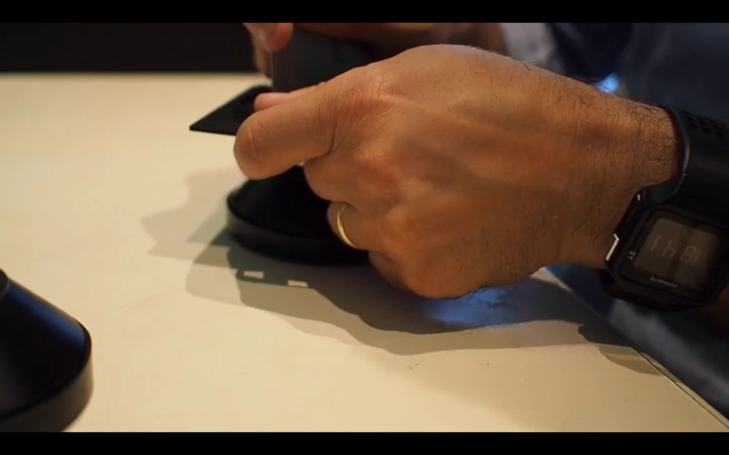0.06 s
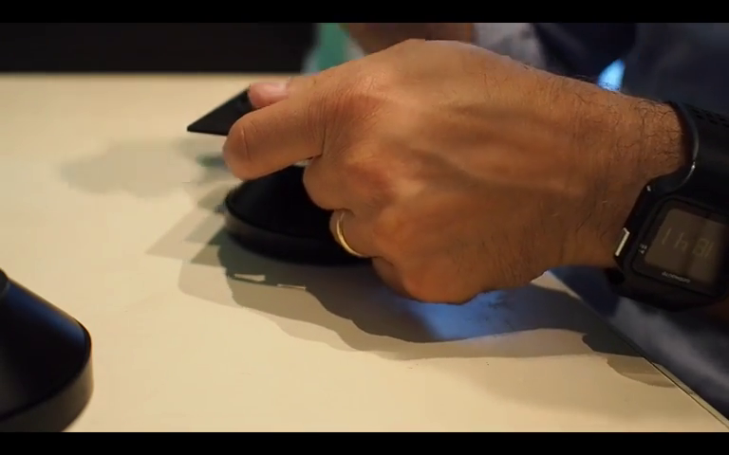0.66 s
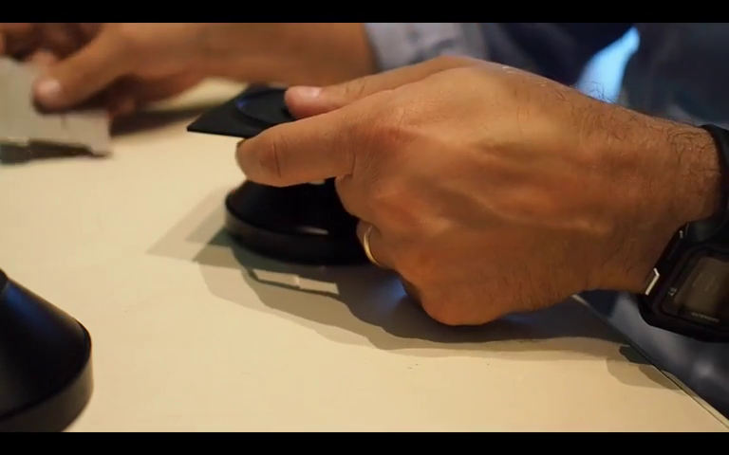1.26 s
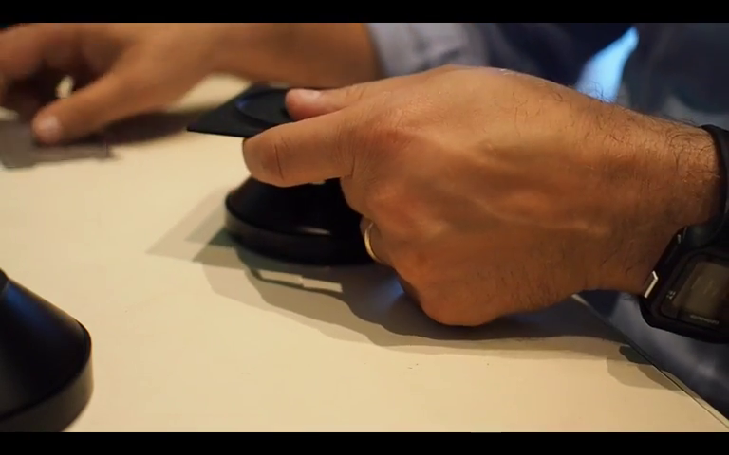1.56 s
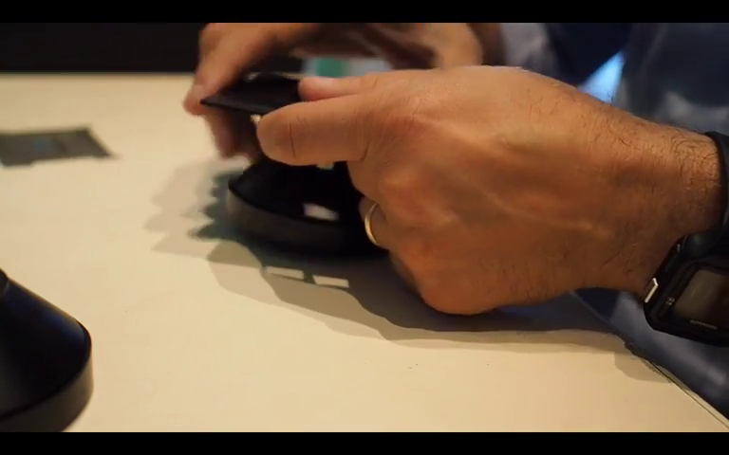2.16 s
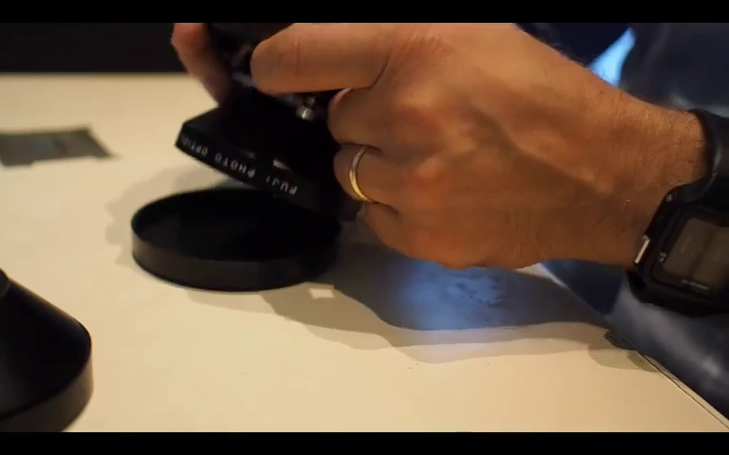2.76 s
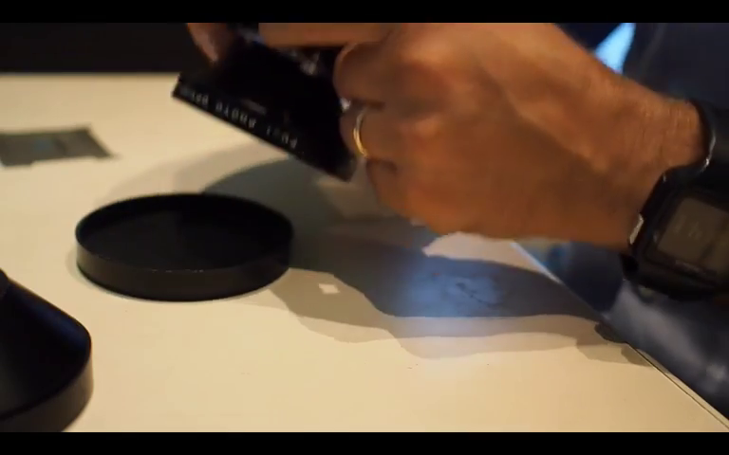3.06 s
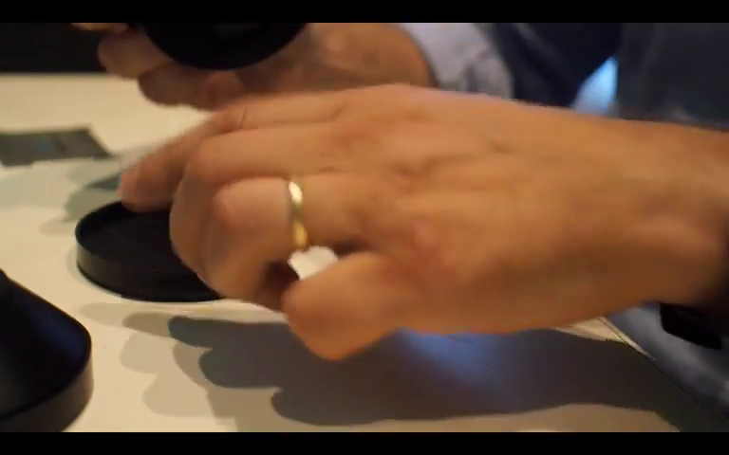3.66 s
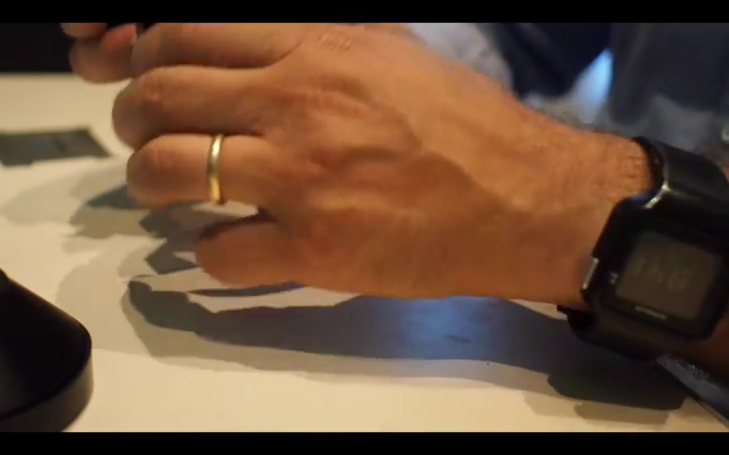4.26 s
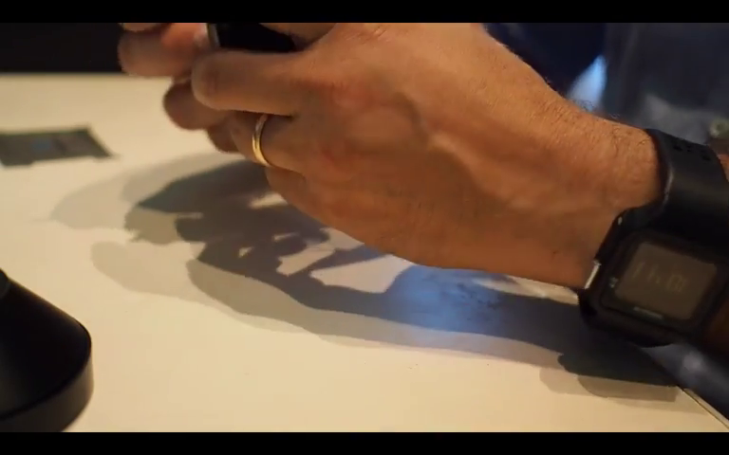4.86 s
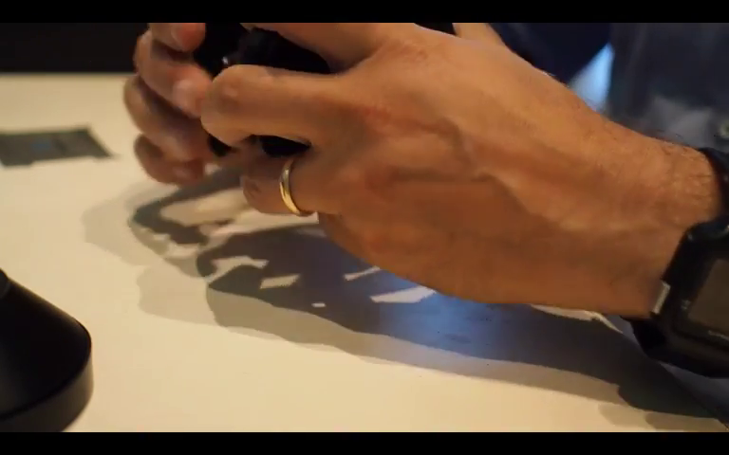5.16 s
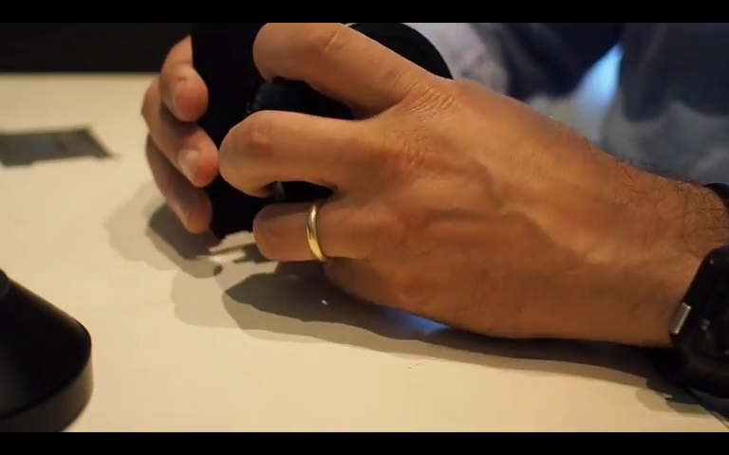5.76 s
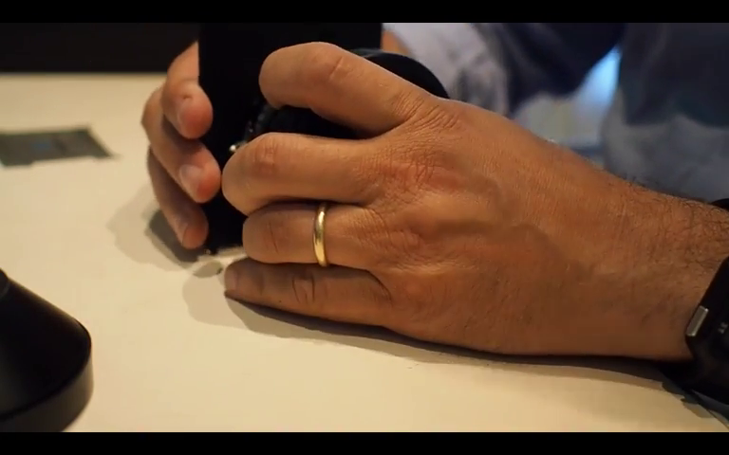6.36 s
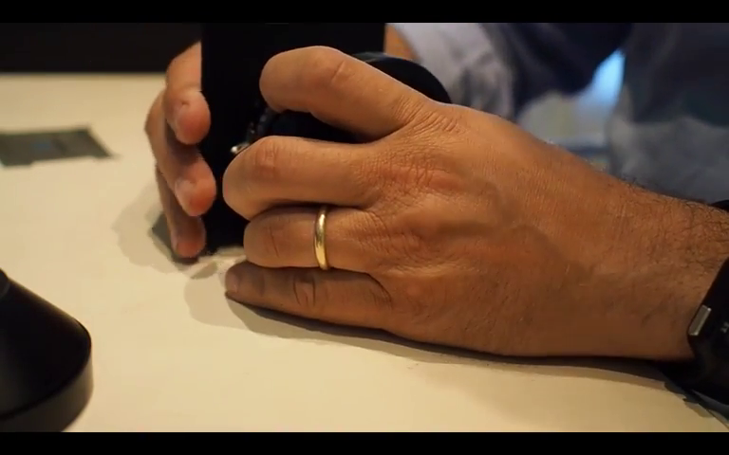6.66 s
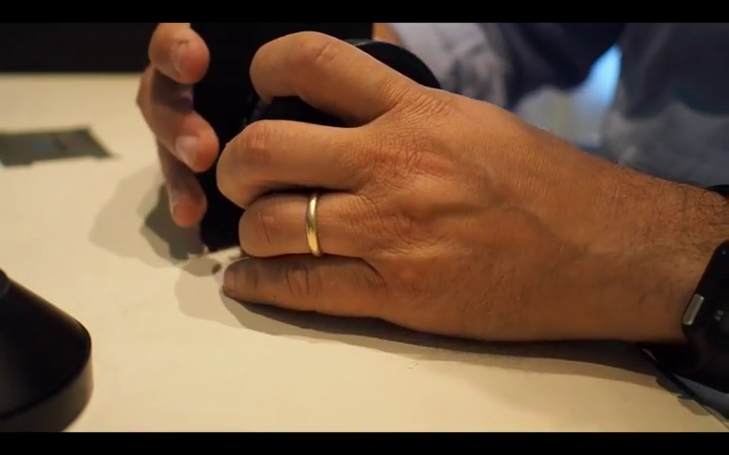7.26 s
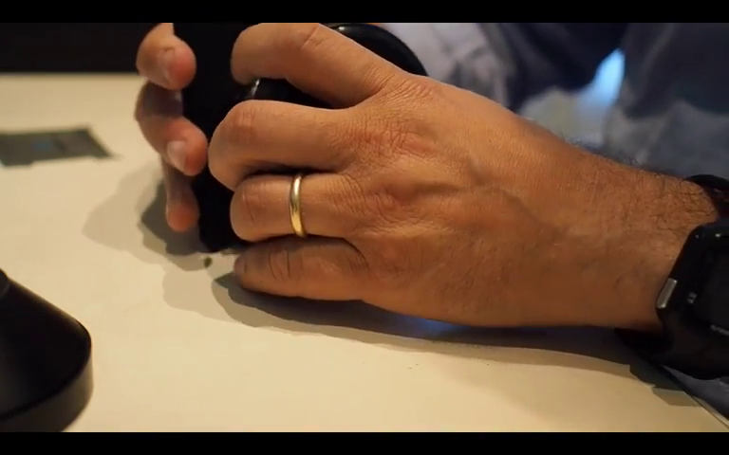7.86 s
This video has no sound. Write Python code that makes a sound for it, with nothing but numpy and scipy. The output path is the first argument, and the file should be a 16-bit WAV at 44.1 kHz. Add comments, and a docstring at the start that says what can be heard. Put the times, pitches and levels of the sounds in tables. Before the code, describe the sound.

A low ventilation rumble with light hiss runs throughout in a small room, with the microphone close to a table. Faint, bright clicks of lens rings come at about 0.2 to 0.4 seconds. Light knocks from 1.3 seconds lead to a hard clatter at 1.6 as a small stand topples, thudding on the tabletop. At 2.6 seconds a metal lens cap drops, bounces sharply and settles by 3 seconds. These two clatters are the loudest sounds, each with a short room echo. Lighter metallic clicks follow between 3.9 and 4.6 seconds, then a single knock on the lens barrel at 4.8. After a faint tap, the lens is set down with two dull bumps at about 6.2 and 6.4 seconds, and one tiny tap follows. A very faint focus motor whirs on and off, around 1 to 2, 3.6 to 5.7 and just after 7 seconds.

```python
"""Small room, a table close to a camera. Ventilation rumbles; the focus motor whirs faintly.
A small stand is knocked over, a metal lens cap drops and rattles to rest, rings click against
the lens barrel, and the lens is set down with two dull bumps. Each knock is a chattering contact
that drives the part's damped modes and a short crack of dense modes. Weight landing on the table
adds a low thud, and the room answers every blow."""
import sys
import numpy as np
from scipy import signal
from scipy.fft import rfft, irfft
from scipy.io import wavfile
from scipy.ndimage import uniform_filter1d

SR = 44100
rng = np.random.default_rng(int(sys.argv[2]) if len(sys.argv) > 2 else 0)


def store_wav(level_fs):
    """Save 16-bit WAV to argv[1]."""
    pcm = np.round(np.clip(np.atleast_2d(level_fs), -1, 1) * 32767)
    wavfile.write(sys.argv[1], SR, pcm.T.astype(np.int16))


N = 349272

# Blows per part: t/s, level/dB, low-pass corner/Hz, chatter decay/s
STAND_KNOCKS = [(1.3335, -29, 1210, .002), (1.478, -36, 400, 0.0043), (1.505, -37.5, 1900, 0.031),
                (1.59, -21, 5000, .0005), (1.5928, -16, 2800, 0.00022), (1.6215, -11, 14000, 0.0017),
                (1.63, -24.5, 198, 0.0006), (1.638, -22, 12000, 0.002), (1.9325, -46.5, 14000, .001),
                (1.943, -47, 12000, 0.0015)]
CAP_KNOCKS = [(2.6248, -12.5, 4570, 0.00022), (2.6473, -17, 4500, 0.0002), (2.673, -21, 3300, 0.00043),
              (2.6898, -9.5, 12000, 0.0015), (2.7605, -14, 4570, 0.00089), (2.895, -24.5, 1480, 0.001),
              (2.9105, -28, 900, 0.0042), (2.933, -34.5, 800, 0.0038)]
RING_CLICKS = [(.236, -51.5, 7000, .006), (.417, -51, 3500, 0.0026), (.4335, -40, 5000, 0.0029),
               (.44, -32.5, 9400, 0.00017), (4.4733, -37, 8000, 0.00087)]
RIM_CLICKS = [(3.9345, -40, 1330, 0.00095), (3.951, -33.5, 1300, 0.011), (4.247, -29, 4470, .0008),
              (4.262, -39, 4000, 0.0017), (4.288, -36, 5470, .026), (4.474, -46, 700, 0.00031),
              (4.554, -45.5, 3000, 0.0024)]
BARREL_KNOCKS = [(4.7862, -25.5, 3300, 0.00031), (5.848, -46.5, 910, .005), (6.751, -51.5, 1200, .0005)]
LENS_BUMPS = [(2.28, -49, 199, 0.071), (6.1833, -25.5, 1000, 0.00057), (6.211, -40, 700, .0025),
              (6.349, -45.5, 500, .0014), (6.3875, -32, 750, 0.0027)]
# Weight landing on the table: t/s, level/dB
TABLE_THUDS = [(.416, -40), (1.6215, -24.5), (1.638, -26.5), (2.3, -47), (2.625, -32.5), (2.688, -29.5),
               (2.76, -37), (2.895, -29.5), (3.914, -37), (3.952, -38.5), (6.1833, -29), (6.349, -35),
               (6.3875, -34)]

# Modes per part: f/Hz, relative level/dB, T60/s
STAND_MODES = [(247, -4.5, 0.18), (383, 3.5, 0.027), (445, -3, 0.062), (776, -11, 0.035),
               (1040, -3.5, 0.062), (1870, 2.5, 0.018), (2177, 10.5, 0.016), (3350, 4, 0.044),
               (3960, -9, 0.025), (4480, 3, 0.053), (5570, 2, 0.049)]
CAP_MODES = [(798, -30, 0.02), (953, -2.5, 0.027), (1770, -15, 0.023), (1840, 7.5, 0.016),
             (1900, -36, 0.23), (2020, 4.5, 0.016), (2320, -1.5, 0.026), (2640, -0.5, 0.015),
             (3240, 1.5, 0.019), (3610, 5, 0.0088), (5500, -11, 0.018)]
RING_MODES = [(940, -15.5, 0.088), (1510, -14, 0.054), (1720, -7, 0.043), (2026, -3, 0.025),
              (2080, -14, 0.036), (3320, 5.5, 0.011), (3730, 0.5, 0.023), (5030, -13.5, 0.037)]
RIM_MODES = [(705, -11, 0.28), (854, 8, 0.032), (980, -3, 0.037), (1560, 7, 0.035), (1790, -27, 0.028),
             (2470, 5.5, 0.015), (3060, 5, 0.023), (5200, 9, 0.01)]
BARREL_MODES = [(430, -7, 0.025), (550, 0, 0.016), (1133, 3, 0.03), (1220, 0.5, 0.04), (2030, -3.5, 0.018),
                (2790, 0.5, 0.039)]
LENS_MODES = [(151, 7.5, 0.035), (245, -5.5, 0.014), (334, -5, 0.077), (476, -7, 0.027),
              (597, -11.5, 0.057), (843, -1.5, 0.025), (1020, -7, 0.021), (1280, -15, 0.027)]
TABLE_MODES = [(98.6, 3.5, 0.19), (117, 6, 0.015), (141.5, 1, 0.27), (174, -10, 0.3), (244.4, -2, 0.11)]
# Crack spectra (dense, heavily damped modes): f/Hz, relative density/dB
STAND_CRACK = [(70, -23), (150, -5), (300, -2.5), (700, -3.5), (1250, -7.5), (2200, -6.5), (5000, -4),
               (8000, -9.5), (15000, -13)]
CAP_CRACK = [(100, -18.5), (380, -17.5), (800, -3.5), (1280, -7), (1900, -2.5), (3000, -9), (6000, -10),
             (10000, -17), (15000, -31.5)]
RING_CRACK = [(300, -39), (900, -3), (2000, 4.5), (2700, -4.5), (4000, 3), (6500, 2), (10000, -1),
              (15000, -2)]
RIM_CRACK = [(300, -9.5), (800, -11), (1150, -5), (1700, -1.5), (3200, -5), (6000, -4.5), (9000, -14),
             (15000, -15)]
BARREL_CRACK = [(200, -7), (450, -6), (800, -3), (1150, 3), (1700, -6), (2500, 4), (7000, -12),
                (15000, -24)]
LENS_CRACK = [(40, -6), (120, 2), (350, 21.5), (1000, -1), (1800, -12), (4000, -6), (15000, -24)]

# Room decay: f/Hz, T60/s
ROOM_T60 = [(100, 0.47), (250, 0.1), (600, 0.56), (1800, 0.56), (4000, 0.48), (8000, 0.45), (15000, .28)]
# Spectra of room tail and background air: f/Hz, relative density/dB
ROOM_COLOUR = [(80, -11), (240, -2.5), (500, 0), (1500, -0.5), (4000, -3), (8000, -4), (15000, -3)]
AIR_COLOUR = [(15, -48), (25, -13), (94, -2), (114, -4), (249, -10.5), (293, -12), (560, -11.5),
              (677, -16.5), (962, -16), (1040, -17), (1330, -18), (11900, -29.5), (16000, -32.5)]
# Resonances of room, ventilation and camera body: f/Hz, width/Hz, relative level/dB
ROOM_MODES = [(91, 3.5, -3), (154.7, 4.3, 6.5), (236.4, 6.1, 6.5), (346, 26, 3), (366, 6.2, -1.5),
              (550, 11, 1)]
AIR_HUMS = [(92.3, 7.2, -1.5), (146, 10, 3.5), (234, 12, -2.5)]
CAMERA_MODES = [(3170, 460, -4.5), (4650, 300, -5), (5700, 370, -9), (6080, 1140, -8)]
# Stereo likeness of room tail, direct crack and background: f/Hz, left-right correlation
ROOM_CORR = [(100, 1), (1000, 1), (2500, 0.98), (5000, 0.72), (9000, 0.0043), (15000, 0.085)]
NEAR_CORR = [(100, 1), (1500, 0.98), (4000, 0.94), (8000, 0.64), (15000, 0.29)]
AIR_CORR = [(60, 0.67), (150, 0.37), (380, 0.35), (950, 0.33), (2380, -0.04), (5980, 0.22), (15000, -0.1)]
# Stereo balance of the knocks: f/Hz, left minus right/dB
NEAR_BALANCE = [(1000, 0), (3000, 0), (6000, 0.5), (10000, 1.5), (14000, 6.5)]
# Focus motor runs: start/s, end/s, level/dB
FOCUS_RUNS = [(0.93, 2.044, -59), (3.608, 4.57, -58), (4.846, 5.75, -65), (7.04, 7.384, -56)]


def gain_of(db):
    """dB to amplitude."""
    return 10 ** (np.asarray(db) / 20)


def unit(x):
    """Scale to unit mean energy per channel."""
    return x / np.sqrt(np.mean(np.sum(x ** 2, axis=-1)) + 1e-20)


def at_level(x, db, blow_s=.01):
    """Scale a blow so its energy, spread over blow_s, has level db."""
    return gain_of(db) * np.sqrt(SR * blow_s) * unit(x)


def read(points, hz):
    """Interpolate a table over log frequency."""
    f, value = np.transpose(points)
    return np.interp(np.log(hz + 1), np.log(f + 1), value)


def add(mix, start_s, sound):
    """Mix in a stereo sound."""
    part = mix[:, round(start_s * SR):][:, :sound.shape[1]]
    part += sound[:, :part.shape[1]]


def bins(size):
    """Real-FFT frequencies in Hz."""
    return np.fft.rfftfreq(size, 1 / SR)


def colour(x, db):
    """Minimum-phase filter, gain per bin; attacks stay sharp."""
    size = x.shape[-1]
    cepstrum = irfft(np.log(gain_of(db)), size)
    cepstrum[..., 1:size // 2] *= 2
    cepstrum[..., size // 2 + 1:] = 0
    return irfft(rfft(x) * np.exp(rfft(cepstrum)), size)


def noise_pair(size, correlation):
    """White noise at two close microphone ports, alike in the bass."""
    corr = np.clip(read(correlation, bins(size)), -1, 1)
    mid, side = rfft(rng.standard_normal((2, size)))
    mid, side = mid * np.sqrt((1 + corr) / 2), side * np.sqrt((1 - corr) / 2)
    return irfft(np.array([mid + side, mid - side]), size)


def shaped(noise, gain):
    """Scene-length noise filtered per bin, at unit RMS."""
    return np.sqrt(N) * unit(irfft(rfft(noise) * gain, N))


def flatten(x, width_bins):
    """Whiten a burst's broad colour; keep its fine structure."""
    power = np.mean(abs(rfft(np.atleast_2d(x))) ** 2, axis=0)
    return unit(colour(x, -10 * np.log10(abs(uniform_filter1d(power, width_bins)) + 1e-9)))


def humps(modes, hz):
    """Power response of Gaussian resonance peaks."""
    return sum(gain_of(db) ** 2 * np.exp(-2 * ((hz - f) / width) ** 2) for f, width, db in modes)


def struck_modes(modes, t, low_hz):
    """Damped modes after one blow; a small part radiates little below low_hz."""
    swing = sum(gain_of(db - 60 * t / max(t60_s, .002)) * np.sin(2 * np.pi * hz * t)
                for hz, db, t60_s in modes)
    return unit(signal.sosfilt(signal.butter(2, low_hz, "high", fs=SR, output="sos"), swing))


def air(level_db=-50):
    """Ventilation rumble, boosted at the room's low modes, plus microphone hiss."""
    hz = bins(N)
    shape = gain_of(read(AIR_COLOUR, hz)) * np.sqrt(1 + humps(AIR_HUMS, hz))
    return gain_of(level_db) * shaped(noise_pair(N, AIR_CORR), shape)


def focus_motor(fade_s=0.087, flutter_db=2.5, flutter_hz=6):
    """Motor hiss in the camera body's resonances; level follows its wavering speed."""
    t = np.arange(N) / SR
    whir = shaped(noise_pair(N, AIR_CORR), np.sqrt(humps(CAMERA_MODES, bins(N))))
    speed = shaped(rng.standard_normal(N), bins(N) < flutter_hz)
    envelope = sum(gain_of(db) * np.clip(np.minimum(t - start_s, end_s - t) / fade_s, 0, 1)
                   for start_s, end_s, db in FOCUS_RUNS)
    return whir * envelope * gain_of(flutter_db * speed)


def room(early, early_s=0.025, gap_s=0.0075, build_s=0.0016, size=20480):
    """Room response: decaying noise with modal peaks; early boosts the nearby reflections."""
    t = np.arange(size) / SR
    hz, frame_s, spectra = signal.stft(noise_pair(size, ROOM_CORR), SR, nperseg=256)
    decay = gain_of(-60 * frame_s / read(ROOM_T60, hz)[:, None])
    tail = signal.istft(spectra * decay, SR, nperseg=256)[1][:, :size]
    onset = 1 - np.exp(-np.maximum(t - gap_s, 0) / build_s)
    swell = onset * (1 + early * np.exp(-t / early_s))
    tone_db = read(ROOM_COLOUR, bins(size)) + 10 * np.log10(1 + humps(ROOM_MODES, bins(size)))
    return colour(flatten(tail * swell, width_bins=30), tone_db)


def table_top(room_db=0.5, n_rooms=3, size=8192):
    """The same low modal thud whenever weight lands on the table."""
    out = np.zeros((2, N))
    thud = np.tile(struck_modes(TABLE_MODES, np.arange(size) / SR, low_hz=77), (2, 1))
    rooms = [room(early=1.4) for _ in range(n_rooms)]
    for k, (start_s, db) in enumerate(TABLE_THUDS):
        sound = at_level(thud, db)
        add(out, start_s, sound)
        add(out, start_s, gain_of(room_db) * signal.fftconvolve(sound, rooms[k % n_rooms], axes=1))
    return out


def contact_force(t, chatter_s, touches_per_s=5000):
    """First contact, then fading random touches of the edges."""
    touches = rng.standard_normal(t.size) ** 3 * (rng.random(t.size) < touches_per_s / SR)
    touches *= np.exp(-t / chatter_s)
    touches[0] += 5
    return flatten(touches, width_bins=50)


def crack_share_db(corner_hz, chatter_s, plain_hz=3000, plain_s=.001):
    """Crack relative to a plain tap; each doubling of hardness or chatter adds more."""
    return 2.0 * np.log2(corner_hz / plain_hz) + 2.6 * np.log2(chatter_s / plain_s)


def knocks(blows, modes, crack_colour, crack_db, crack_s, low_hz, room_db, early, n_rooms=2, size=8192):
    """Contact force drives one part's modes and crack; the room follows."""
    out = np.zeros((2, N))
    t, hz = np.arange(size) / SR, bins(size)
    ringing = struck_modes(modes, t, low_hz)
    balance_db = np.outer([.5, -.5], read(NEAR_BALANCE, hz))
    rooms = [room(early) for _ in range(n_rooms)]  # reflections change as the part moves
    for k, (start_s, db, corner_hz, chatter_s) in enumerate(blows):
        force = contact_force(t, chatter_s)
        burst = flatten(noise_pair(size, NEAR_CORR) * np.exp(-t / crack_s), width_bins=50)
        crack = unit(colour(burst, read(crack_colour, hz)))
        response = ringing + gain_of(crack_db + crack_share_db(corner_hz, chatter_s)) * crack
        body = signal.fftconvolve(response, force[None], axes=1)[:, :size]
        softness_db = -10 * np.log10(1 + (hz / corner_hz) ** 3)  # softer, longer contact: less treble
        sound = at_level(colour(body, softness_db + balance_db), db)
        add(out, start_s, sound)
        add(out, start_s, gain_of(room_db) * signal.fftconvolve(sound, rooms[k % n_rooms], axes=1))
    return out


def lens():
    """Dull bumps of the lens; held between hands, it has strong early reflections."""
    return knocks(LENS_BUMPS, LENS_MODES, LENS_CRACK,
                  crack_db=1.7, crack_s=0.0042, low_hz=125, room_db=0.0, early=2.7)


def barrel():
    """One knock and two faint taps on the barrel's midrange modes."""
    return knocks(BARREL_KNOCKS, BARREL_MODES, BARREL_CRACK,
                  crack_db=-3.0, crack_s=0.0026, low_hz=395, room_db=-6.5, early=1.7)


def rim():
    """Rim clicks, some drawn out by chatter."""
    return knocks(RIM_CLICKS, RIM_MODES, RIM_CRACK,
                  crack_db=-5.5, crack_s=0.0037, low_hz=740, room_db=-0.1, early=2.8)


def rings():
    """Light, bright clicks of rings against the barrel."""
    return knocks(RING_CLICKS, RING_MODES, RING_CRACK,
                  crack_db=3.0, crack_s=0.0026, low_hz=800, room_db=-5, early=2.0)


def stand():
    """Small stand topples: light knocks, then a hard clatter."""
    return knocks(STAND_KNOCKS, STAND_MODES, STAND_CRACK,
                  crack_db=3, crack_s=0.0032, low_hz=200, room_db=0.4, early=0.65)


def lens_cap():
    """Metal cap drops, bounces hard and settles with softer contacts."""
    return knocks(CAP_KNOCKS, CAP_MODES, CAP_CRACK,
                  crack_db=-2.0, crack_s=0.0015, low_hz=1350, room_db=-3.5, early=0.207, n_rooms=4)


def scene():
    """Stereo sum of parts, table and background."""
    parts = stand() + lens_cap() + rings() + rim() + barrel() + lens()
    return parts + table_top() + air() + focus_motor()


def record(dry, edge_hz=16200):
    """Input clipping at full scale, then the band limit."""
    clipped = np.clip(dry, -1, 1)
    lowpass = signal.firwin(255, edge_hz, window=("kaiser", 8), fs=SR)
    return signal.oaconvolve(clipped, lowpass[None], "same")


dry = scene()
out = record(dry)
store_wav(out)
```